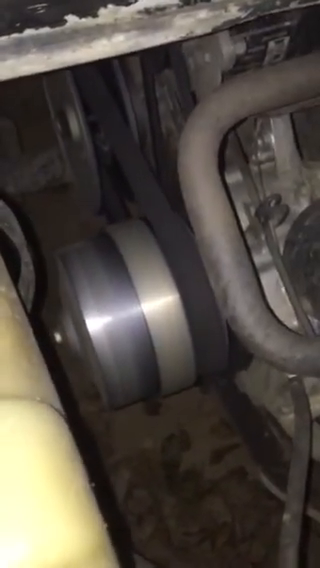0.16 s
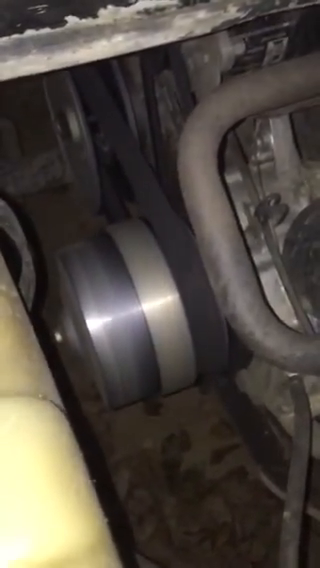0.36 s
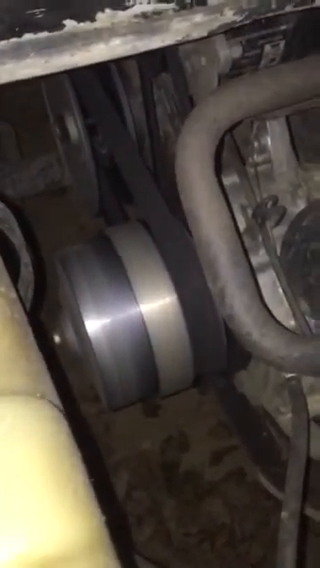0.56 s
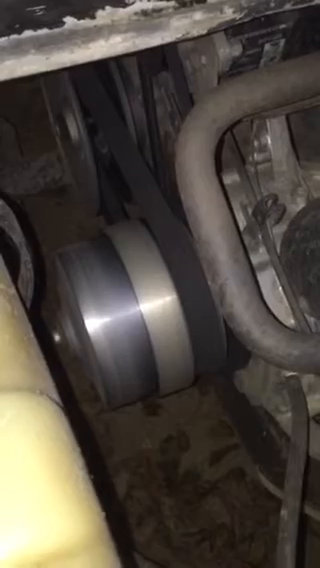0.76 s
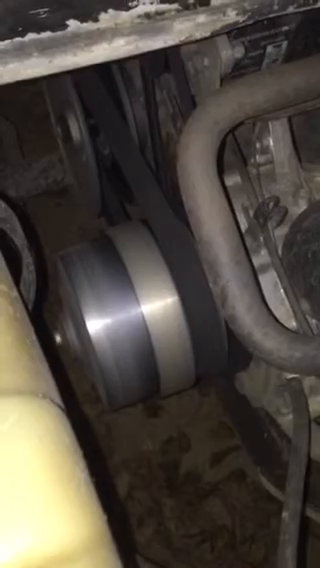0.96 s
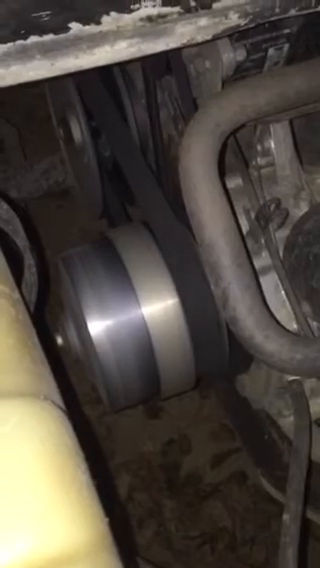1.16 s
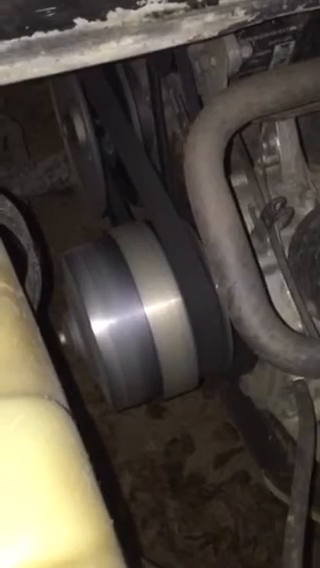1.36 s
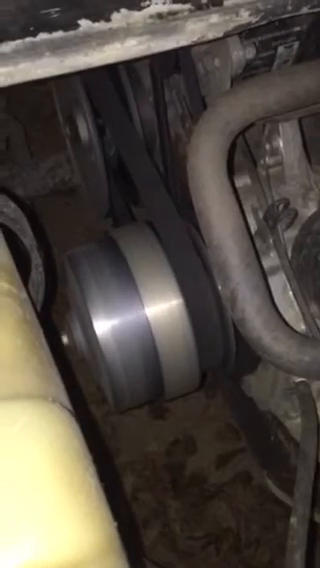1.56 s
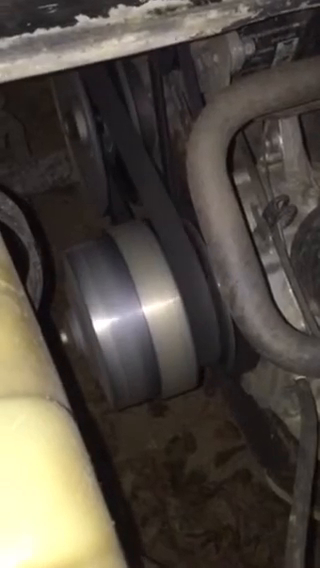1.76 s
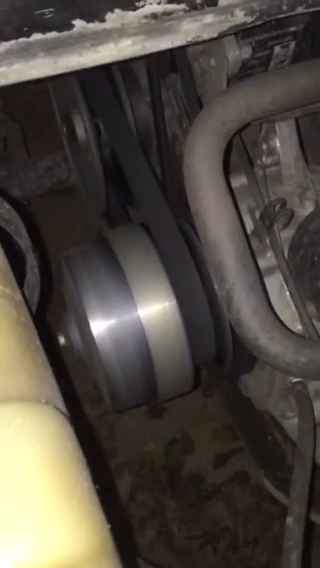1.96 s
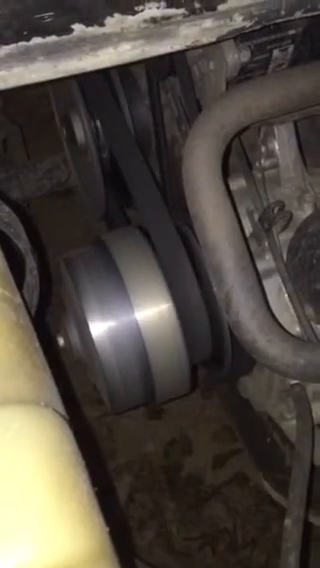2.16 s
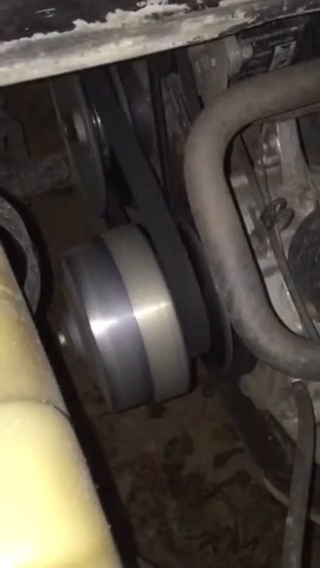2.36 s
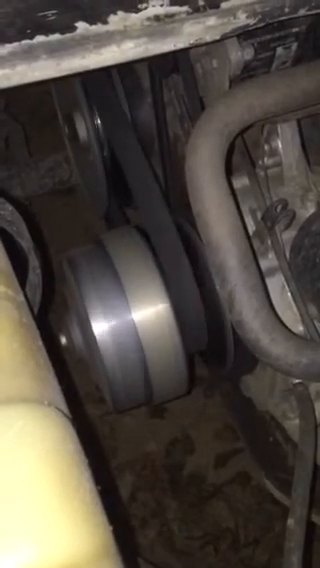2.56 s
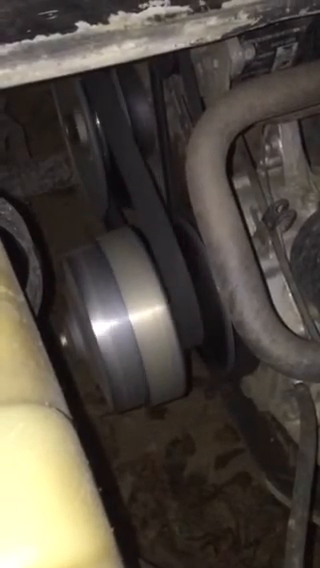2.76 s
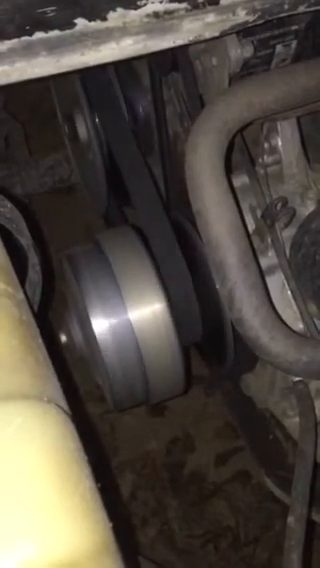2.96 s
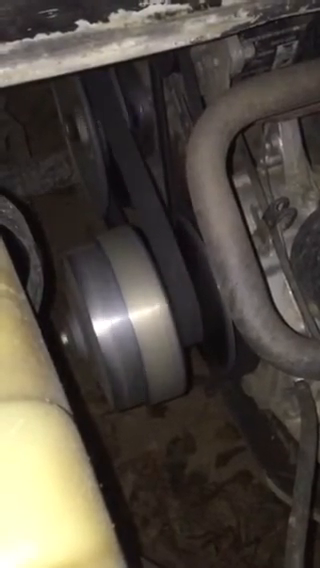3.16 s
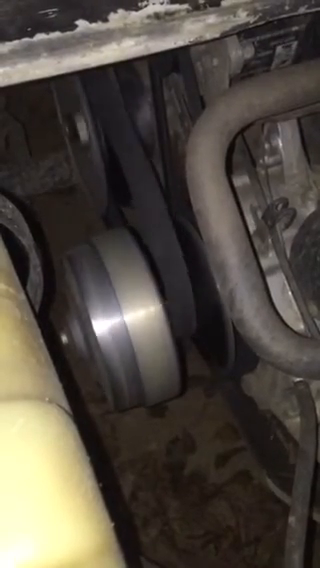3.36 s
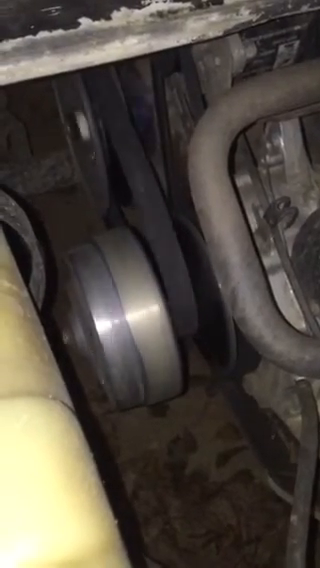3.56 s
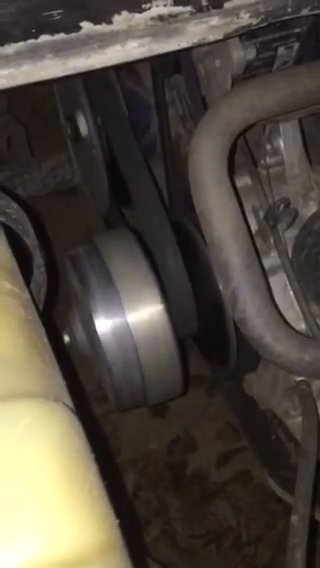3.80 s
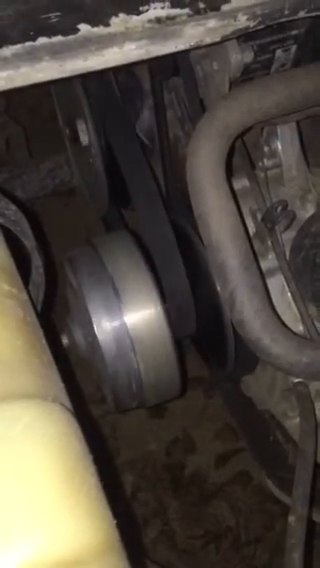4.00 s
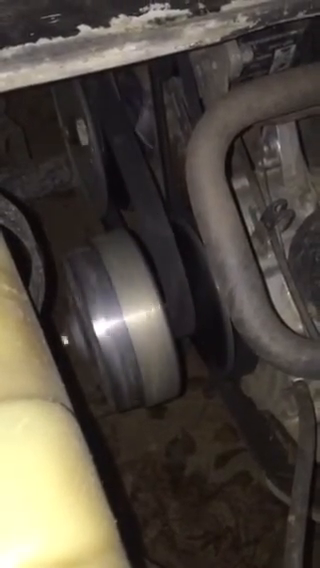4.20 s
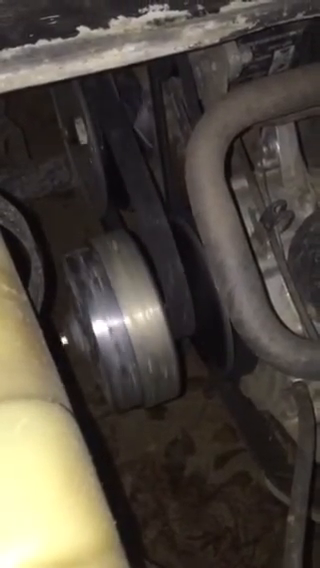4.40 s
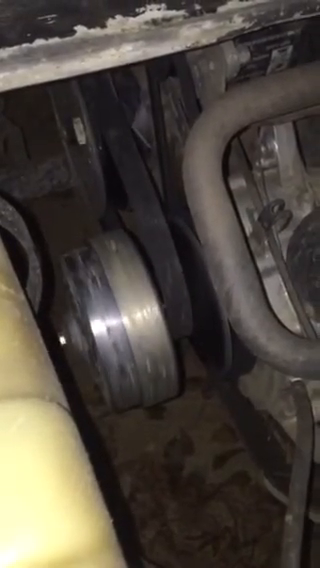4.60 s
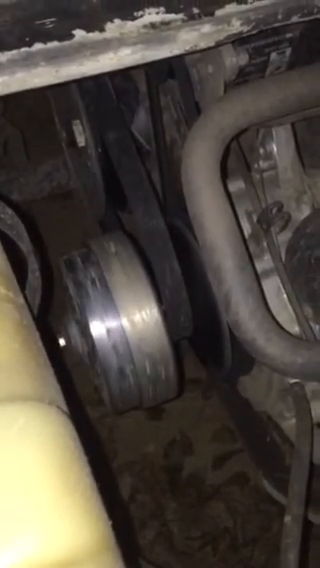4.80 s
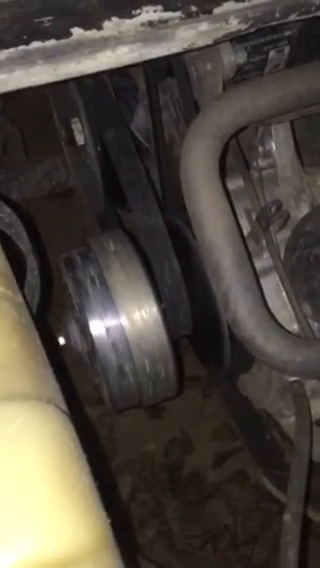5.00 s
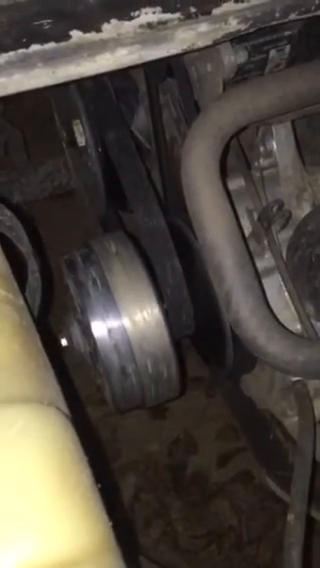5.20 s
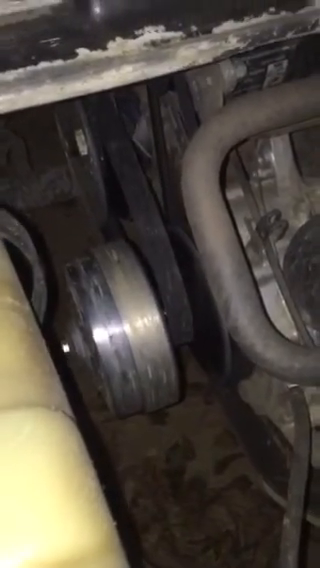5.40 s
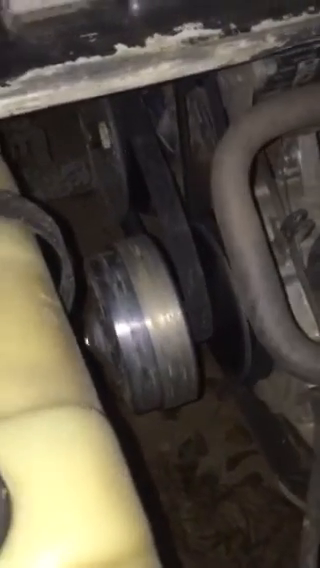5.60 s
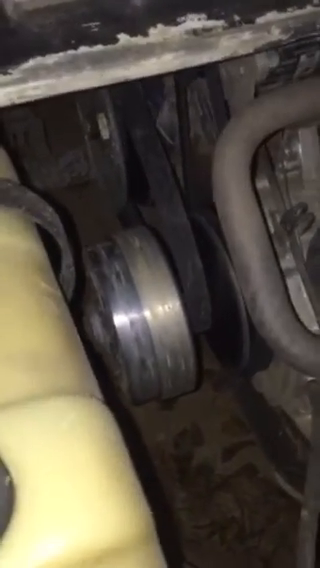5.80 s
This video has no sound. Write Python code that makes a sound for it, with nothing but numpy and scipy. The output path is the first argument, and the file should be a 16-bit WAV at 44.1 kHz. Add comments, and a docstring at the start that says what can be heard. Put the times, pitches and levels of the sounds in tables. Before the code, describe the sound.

Heard up close, a cart's small engine chugs, hums and rattles, losing speed from the start. Its beats spread apart, and light knocks and valve ticks come through the belt's whirr. A loud metal clack from the clutch cuts the level, and weaker knocks and rubbing follow until everything stops turning. A quiet rumble is left, with faint ticks and one brief squeak.

```python
"""Cart engine coasting to rest

One microphone close to the seat of a cart, where a small one-cylinder engine runs down from idle.
Each turn of the crank thumps in the muffler and puffs air; valves tick, loose parts shake the frame
and the belt rubs. The clutch drops out with a clack, the shaft stops, and a low rumble is left,
with a few faint ticks and one small squeak."""
import sys
import numpy as np
from scipy import signal
from scipy.fft import rfft, irfft
from scipy.io import wavfile
from scipy.ndimage import uniform_filter1d

SR = 44100
rng = np.random.default_rng(int(sys.argv[2]) if len(sys.argv) > 2 else 0)


def digitize_waveform(pressure):
    """Quantize a signal to 16-bit integers and store it at the path in sys.argv[1].

    Rows of a 2-D input are taken as channels; values are limited to [-1, 1].
    """
    field = np.atleast_2d(pressure).T
    bounded = np.clip(field, -1, 1)
    quanta = np.round(bounded * 32767).astype(np.int16)
    wavfile.write(sys.argv[1], SR, quanta)


N = 257984
TIME, BLOW_TIME = np.arange(N) / SR, np.arange(round(.3 * SR)) / SR  # seconds: the scene, one blow
START_TURNS_PER_S, SLOWING_TURNS_PER_S2, CLACK_S = 23.52, 5.488, 3.4645


def gain_of(db):
    """Decibels to a factor."""
    return 10 ** (np.asarray(db) / 20)


def unit_rms(x):
    """Scales to an rms of one."""
    return x / np.sqrt(np.mean(x ** 2) + 1e-20)


def band_rms(x, lo_hz, hi_hz):
    """Rms of x between two frequencies."""
    hz = np.fft.rfftfreq(len(x), 1 / SR)
    return np.sqrt(2 * np.sum(abs(rfft(x)[(hz > lo_hz) & (hz < hi_hz)]) ** 2)) / len(x)


def colour(x, spectrum, peaks=(), lift_db=0):
    """Filters x by a spectrum with resonances standing on it."""
    hz = np.fft.rfftfreq(len(x), 1 / SR)
    corner_hz, db = np.transpose(spectrum)
    power = gain_of(2 * np.interp(np.log(hz + 1), np.log(corner_hz + 1), db))
    for centre, width, peak_db in peaks:
        power += gain_of(2 * (peak_db + lift_db)) / (1 + (2 * (hz - centre) / width) ** 2) ** 2
    return irfft(rfft(x) * np.sqrt(power), len(x))


def resonate(x, hz, *widths_hz):
    """Rings x at one frequency, once through for each width."""
    for width in widths_hz:
        r = np.exp(-np.pi * width / SR)
        x = 2 * signal.lfilter([1 - r], [1, -r * np.exp(2j * np.pi * hz / SR)], x).real
    return x


def wander(per_s, depth_db):
    """A gain that wanders at random about per_s times a second."""
    drift = signal.lfilter([1], [1, -np.exp(-2 * np.pi * per_s / SR)], rng.standard_normal(N))
    return gain_of(depth_db * unit_rms(drift))


def steadied(x, share, samples):
    """Evens out a share of the slow swells of x."""
    x = unit_rms(x)
    return unit_rms(x / (abs(uniform_filter1d(x ** 2, samples)) + .02) ** (share / 2))


def burst(rise_s, t60):
    """Envelope of a blow: a short rise and an exponential fall."""
    return (1 - np.exp(-BLOW_TIME / rise_s)) * gain_of(-60 * BLOW_TIME / t60)


def place(sound, starts_s, dbs):
    """Plays a sound at each start, with its gain."""
    impulses = np.zeros(N)
    np.add.at(impulses, (np.asarray(starts_s) * SR).astype(int), gain_of(dbs))
    return signal.oaconvolve(impulses, sound)[:N]


def muffler(turns, hz=65, peak_s=.02, width_s=.023):
    """Each turn pushes a slug of air that swells and dies in the muffler; air sloshes in between."""
    t = np.arange(round(.15 * SR)) / SR
    thump = np.exp(-((t - peak_s) / width_s) ** 2) * np.cos(2 * np.pi * hz * t - 1)
    pushes = np.diff(np.floor(turns), prepend=-1) * wander(8, .47)
    beats = signal.oaconvolve(pushes, thump)[:N]
    running_rms = np.sqrt(uniform_filter1d(beats ** 2, SR // 3) + 1e-3 * np.mean(beats ** 2))
    slosh = unit_rms(resonate(np.diff(rng.standard_normal(N + 1)), hz, 30, 40))
    return beats / running_rms + .2 * slosh


def shaking(noise, turns, speed, slow):
    """Many small blows, fewer and more distinct as the shaft slows, shake the frame and housing."""
    lands = rng.random(N) < (40 + 25 * speed) / SR
    hits = lands * gain_of(1.6 * np.minimum(rng.exponential(1, N), 4))
    jolts = steadied(signal.oaconvolve(hits, burst(.004, .05))[:N], 1, SR // 4)
    rocking = 1 + .11 * np.cos(2 * np.pi * (turns - .4))
    return steadied(noise * (1 + 1.2 * slow * jolts) * rocking, .99, SR // 4)


# The broad spectrum of the rattle. Each row: frequency in Hz, density in dB.
RATTLE_SPECTRUM = [(190, -34.5), (330, -7), (372, -2.5), (466, -7.5), (597, -5), (931, -12), (1560, -6),
                   (1750, -11.5), (1920, -8), (3500, -23), (4550, -49.5), (7700, -120)]
# The frame's modes. Each row: frequency in Hz, width in Hz, relative level in dB.
FRAME_MODES = [(593.6, 71, -9), (660.5, 15, -13), (788, 41, -10), (1045, 60, -15), (1148, 100, -11.5),
               (1265, 37, -10), (1408, 54, -6.5), (1545, 17, -11), (1980, 41, -13), (2048, 55, -10.5),
               (2207, 60, -12), (2615, 44, -19)]


def frame_rattle(shake, slow):
    """The shaking rings the frame; a slow shaft favours a low mode."""
    body = colour(shake, RATTLE_SPECTRUM, FRAME_MODES, lift_db=5.5)
    low_mode = unit_rms(resonate(resonate(shake, 620, 90), 680, 230))
    body += .2 * slow ** 2 * low_mode * band_rms(body, 470, 1600)
    return body / band_rms(body, 430, 1600)


# The drone under the seat. Each row: frequency in Hz, density in dB.
DRONE_SPECTRUM = [(90, -8), (110, -8.5), (170, -12), (240, -6.5), (340, -4), (440, -36.5), (750, -120)]
# The sump's low modes. Each row: frequency in Hz, width in Hz, relative level in dB.
SUMP_MODES = [(147, 26, -1), (204.8, 23, -1.5), (269.5, 33, 1)]


def sump_drone(shake, speed_lost):
    """The shaking drones in the sump, weaker as the crank slows."""
    return gain_of(-3.5 - 4 * speed_lost) * unit_rms(colour(shake, DRONE_SPECTRUM, SUMP_MODES))


# Brief swells and dips. Each row: centre in seconds, change of the hum in dB, of the ring in dB.
SWELLS = [(0.31, -13, -11), (0.92, -22, 0), (1.09, -4, 7), (1.45, 9, 5), (1.72, 4, 4), (1.92, 8, 6.5),
          (2.04, 7.5, 1.5), (2.11, -11, -1), (2.25, 7, 3), (2.4, 1.5, 3), (2.6, 6, 1), (2.77, 1.5, 3),
          (2.85, -12, -4), (3.0, -10, -1.5), (3.59, 6, 6), (3.72, -12, -7), (3.89, 6, 9), (3.96, 3.5, -2),
          (4.09, 4, -1), (4.18, 11.5, -2), (4.25, -1, -5)]


def swells(width_s=.04):
    """Gains of hum and ring: one bell for each swell or dip, on a smooth random waver."""
    centres_s, *columns = np.transpose(SWELLS)
    bells = np.exp(-((TIME[:, None] - centres_s) / width_s) ** 2)
    gains = []
    for change_db, waver_db in zip(columns, (1.1, 1.5)):
        waver = unit_rms(uniform_filter1d(np.log(wander(2, 1)), SR // 30))
        gains.append(gain_of(bells @ change_db + waver_db * waver))
    return gains


HUM_HZ, HUM_WIDTH_HZ = 374, 14


def frame_hum(noise, speed_lost):
    """One strong frame mode hums, standing further out of the rattle as the crank slows."""
    hum = steadied(resonate(noise, HUM_HZ, HUM_WIDTH_HZ, 80), .85, 2000)
    return .74 * gain_of(-11.5 + 16 * speed_lost) * hum


# The housing's strongest modes. Each row: frequency in Hz, width in Hz.
HOUSING_MODES = [(1697, 25), (1727, 25), (1785, 40)]


def housing_ring(shake, speed, peak_turns_per_s=9.57):
    """The shaking rings the housing, most strongly near one crank speed."""
    ring = sum(resonate(shake, hz, width, 150) for hz, width in HOUSING_MODES)
    lift_db = 11 * np.exp(-((speed - peak_turns_per_s) / 5.6) ** 2)
    return .8 * gain_of(-8 + lift_db) * steadied(ring, .65, 3000)


# The belt's whirr, running fast and slow. Each row: frequency in Hz, density in dB.
BELT_FAST = [(1060, -33), (1800, -7), (1920, -6.5), (3320, -9), (3840, -9), (5010, -9), (6530, -12),
             (7420, -13), (8280, -12.5), (13300, -21.5), (16000, -24.5)]
BELT_SLOW = [(1060, -35), (1800, -9.5), (1940, -9), (3320, -20.5), (4410, -6.5), (5060, -17), (5850, -11),
             (7630, -12.5), (8360, -9.5), (10600, -20), (16000, -22)]
# Pulley resonances, fast and slow. Each row: frequency in Hz, width in Hz, relative level in dB.
PULLEY_FAST = [(3777, 92, -1), (4450, 52, -2.5), (5830, 84.4, -4.5), (6310, 130, 0), (6710, 62, 0.5),
               (7870, 74, -5), (8460, 250, -7.5), (10030, 170, -3.5), (10990, 150, -11.5),
               (11700, 97, -13.5)]
PULLEY_SLOW = [(4500, 120, -4), (5875, 200, 3), (6580, 130, -2), (7100, 140, -3.5), (7660, 55, -8.5),
               (8300, 130, -6.5), (9110, 86, -5), (9810, 210, -5), (11500, 140, -11.5), (12060, 460, -8)]


def belt(turns, speed):
    """Belt and pulleys whirr, with a bright puff of air each turn, then rub as the speed falls."""
    fast = np.clip((speed - 4) / 10, 0, 1)
    fast_noise, slow_noise = rng.standard_normal((2, N)) * wander(60, 1)
    whirr = unit_rms(colour(fast_noise, BELT_FAST, PULLEY_FAST, lift_db=-4.5))
    rub = unit_rms(colour(slow_noise, BELT_SLOW, PULLEY_SLOW, lift_db=-5.5))
    air_spectrum = [(4000, -29), (7000, -2), (11000, -5.5), (16000, -7.5)]
    air = unit_rms(colour(rng.standard_normal(N), air_spectrum, peaks=[(11800, 200, 3)]))
    puffs = air * np.exp(2.5 * (np.cos(2 * np.pi * (turns - .5)) - 1))
    return np.sqrt(fast) * (whirr + .54 * puffs) + np.sqrt(1 - fast) * rub


# Faint gear whines. Each row: cycles per crank turn, relative level in dB.
GEAR_WHINES = [(36, -2), (45.3, 0), (53.2, -1)]


def gears(turns, speed):
    """Meshing teeth whine and fall with the crank, louder where they cross a frame mode."""
    teeth = sum(gain_of(db) * np.sin(2 * np.pi * (cycles * turns + rng.random()))
                for cycles, db in GEAR_WHINES)
    whine = colour(teeth, RATTLE_SPECTRUM, FRAME_MODES, lift_db=8.5)
    return gain_of(-13.5) * unit_rms(speed * whine)


def valves(turns, speed, lead_turns=.239):
    """A valve squeaks and ticks before each thump until the clack, clearer as the crank slows."""
    end = round(CLACK_S * SR) - SR // 10
    at = np.flatnonzero(np.diff(np.floor(turns[:end] + lead_turns)))
    tick = burst(.0032, .046) * np.sin(2 * np.pi * 3420 * BLOW_TIME)
    tick_db = -19 - np.maximum(speed[at] - 7.6, 0)
    noise = rng.standard_normal(len(BLOW_TIME))
    squeak = burst(.006, .073) * unit_rms(resonate(resonate(noise, 4500, 292), 4450, 500))
    squeak_db = -17 - 1.41 * speed[at]
    return place(tick, at / SR, tick_db) + place(squeak, at / SR - .016, squeak_db)


# Loose parts knocking. Each row: start in seconds, peak level in dB, strongest region in Hz.
KNOCKS = [(2.02, -26, 690), (2.27, -18, 650), (2.53, -27, 660), (2.808, -18, 590), (3.0, -35, 600),
          (3.175, -21, 700), (3.445, -18, 1700), (3.66, -30, 1700), (3.746, -26.5, 1660),
          (3.806, -26.5, 1730), (3.863, -22.5, 1080), (3.898, -25, 770), (3.949, -24.5, 376),
          (3.987, -27, 1040), (4.025, -30, 620), (4.134, -26, 700), (4.248, -29, 594)]


def knocks(db_per_octave=-13):
    """A loose part strikes the frame and shakes the modes around one frequency."""
    modes = [mode[:2] for mode in FRAME_MODES] + [(HUM_HZ, HUM_WIDTH_HZ)] + HOUSING_MODES
    out = np.zeros(N)
    for start_s, db, centre_hz in KNOCKS:
        blow = rng.standard_normal(len(BLOW_TIME)) * burst(.0017, .07)
        knock = np.zeros_like(blow)
        for hz, width in modes:
            reach = gain_of(db_per_octave * abs(np.log2(hz / centre_hz)))
            knock += reach * resonate(blow, hz, width, 6 * width) / np.sqrt(width)
        out += place(knock / abs(knock).max(), [start_s], [db])
    return out


# The clutch's crack. Each row: frequency in Hz, density in dB.
CRACK_SPECTRUM = [(88, -48), (150, -30.5), (393, 0.5), (783, -13.5), (1330, -8), (2310, -9), (2600, -5.5),
                  (2920, -13.5), (5380, -15.5), (6940, -3), (7970, -14.5), (14700, -18), (16500, -37)]
# Its steel parts. Each row: frequency in Hz, relative level in dB, seconds to fall by 60 dB.
CLUTCH_MODES = [(380, -1, .07), (440, -4, .06), (520, -7, .06), (1030, -14, .16), (1845, -22, .3),
                (2050, -14, .08), (2760, -21, .28), (2798, -22, .28), (4700, -18, .08), (5950, -20, .15),
                (6130, -14, .1), (6718, -12, .1), (7090, -22, .09), (7424, -14, .07), (8457, -28, .12),
                (9507, -24, .12), (10760, -18, .15)]


def clutch_clack():
    """The clutch snaps open: a broad crack and the ring of its steel parts."""
    crack = unit_rms(colour(rng.standard_normal(len(BLOW_TIME)), CRACK_SPECTRUM))
    crack *= np.minimum(1.3 * burst(.00076, .084), 1)  # grinds for a moment
    ring = sum(gain_of(db) * burst(.00066, t60) * np.sin(2 * np.pi * (hz * BLOW_TIME + rng.random()))
               for hz, db, t60 in CLUTCH_MODES)
    return place(crack + 1.2 * ring, [CLACK_S], dbs=[-3])


# Rumble and hiss around the cart. Each row: frequency in Hz, density in dB.
RUMBLE_SPECTRUM = [(15, -51), (25, -22.5), (75, 0.5), (134, -0.5), (152, 1), (226, -11), (286, -4),
                   (344, -22.5), (480, -13.5), (620, -33), (1060, -120)]
HISS_SPECTRUM = [(240, -31), (400, -9.5), (481, -18), (512, -19), (906, -21.5), (1230, -28), (1380, -17.5),
                 (1600, -26), (4310, -31), (4650, -28), (6340, -34), (16000, -45)]
# One lull in the rumble. Each row: time in seconds, level in dB.
RUMBLE_LEVELS = [(5.51, -54), (5.54, -65), (5.76, -63), (5.8, -51)]


def background():
    """A lumpy low rumble and a thin hiss, uncovered when the engine stops."""
    rumble = colour(rng.standard_normal(N) * wander(12, 3), RUMBLE_SPECTRUM)
    level = gain_of(np.interp(TIME, *np.transpose(RUMBLE_LEVELS)))
    hiss = unit_rms(colour(rng.standard_normal(N), HISS_SPECTRUM))
    return level * rumble / band_rms(rumble, 40, 400) + gain_of(-67) * hiss


# Ticks in the quiet. Each row: start in seconds, relative level in dB, centre in Hz.
FAINT_TICKS = [(4.9794, -53.5, 2040), (5.0509, -45, 8600), (5.0573, -52.5, 1720), (5.0794, -43.5, 8300),
               (5.2007, -49, 2430)]


def faint_ticks():
    """Each tick is a grain of bright noise that dies quickly."""
    out = np.zeros(N)
    for start_s, db, hz in FAINT_TICKS:
        noise = rng.standard_normal(len(BLOW_TIME))
        grain = unit_rms(resonate(noise, hz, 1200, 2500))
        grain += .29 * unit_rms(resonate(noise, 1860, 1000)) + .28 * noise
        out += place(.45 * grain * burst(.00071, .046), [start_s], [db])
    return out


def faint_squeak(start_s=5.568, length_s=.045, from_hz=1950, to_hz=2550):
    """One short, rough, rising note."""
    progress = np.clip((TIME - start_s) / length_s, 0, 1)
    envelope = np.sin(np.pi * np.sqrt(progress))
    roughness = 1 + .5 * unit_rms(resonate(rng.standard_normal(N), 0, 253))
    hz = from_hz + (to_hz - from_hz) * progress
    return gain_of(-55) * envelope * roughness * np.sin(2 * np.pi * np.cumsum(hz) / SR)


# The engine from close by, dropping when the clutch lets go.
# Each row: time in seconds, then the levels of frame, belt and muffler in dB.
ENGINE_LEVELS = [(0.0, -23.5, -26, -33), (0.3, -25, -26, -34.5), (0.53, -24, -26.5, -30.5),
                 (0.7, -24.5, -25.5, -31), (1.36, -24, -24, -25), (2.0, -25, -26.5, -31.5),
                 (2.41, -27, -29.5, -30.5), (3.0, -28.5, -32.5, -41.5), (3.44, -30, -35.5, -39),
                 (3.53, -36, -43, -50), (3.655, -40.5, -48, -60), (3.68, -40.5, -42, -62),
                 (3.82, -38.5, -38, -52), (4.08, -40.5, -39, -62), (4.13, -45, -43, -65),
                 (4.3, -49, -39, -65), (4.521, -57, -44, -70), (4.57, -65, -69, -75), (4.62, -76, -82, -80)]


def scene():
    """The crank slows evenly to rest; one close microphone feeds both channels."""
    speed = np.maximum(START_TURNS_PER_S - SLOWING_TURNS_PER_S2 * TIME, 0)
    turns = .22 + np.cumsum(speed) / SR
    speed_lost = 1 - speed / START_TURNS_PER_S
    slow = 1 - speed / 26  # a little above zero even at idle
    times_s, *columns = np.transpose(ENGINE_LEVELS)
    frame_gain, belt_gain, muffler_gain = (gain_of(np.interp(TIME, times_s, db, right=-120))
                                           for db in columns)
    hum_swell, ring_swell = swells()
    mono = muffler_gain * muffler(turns)
    noise = rng.standard_normal(N)
    shake = shaking(noise, turns, speed, slow)
    ringing = hum_swell * frame_hum(noise, speed_lost) + ring_swell * housing_ring(shake, speed)
    mono += belt_gain * (sump_drone(shake, speed_lost) + belt(turns, speed))
    mono += frame_gain * (frame_rattle(shake, slow) + ringing + gears(turns, speed))
    mono += valves(turns, speed) + knocks() + clutch_clack()
    mono += background() + faint_ticks() + faint_squeak()
    return np.array([mono, mono])


def record(dry):
    """The microphone drops deep bass; the input stage softens the clack; the top treble is cut."""
    low_cut_hz, ceiling, high_cut_hz = 42, .72, 15800
    lean = signal.sosfilt(signal.butter(2, low_cut_hz, "high", fs=SR, output="sos"), dry)
    soft = lean / (1 + abs(lean / ceiling) ** 6) ** (1 / 6)
    lowpass = signal.firwin(511, high_cut_hz, window=("kaiser", 9), fs=SR)
    return signal.oaconvolve(soft, lowpass[None], "same")


dry = scene()
out = record(dry)
digitize_waveform(out)
```